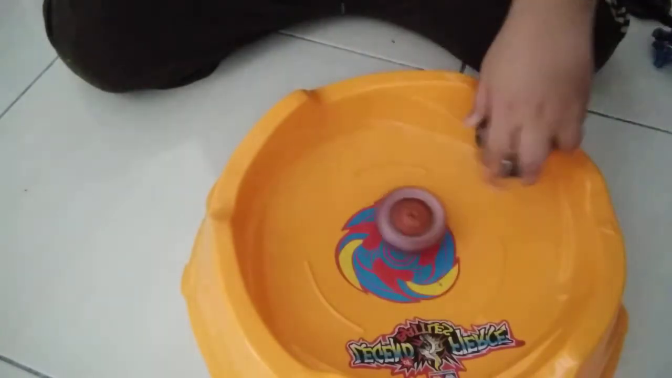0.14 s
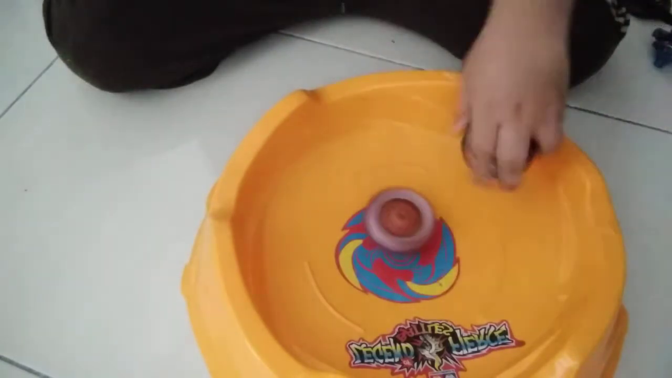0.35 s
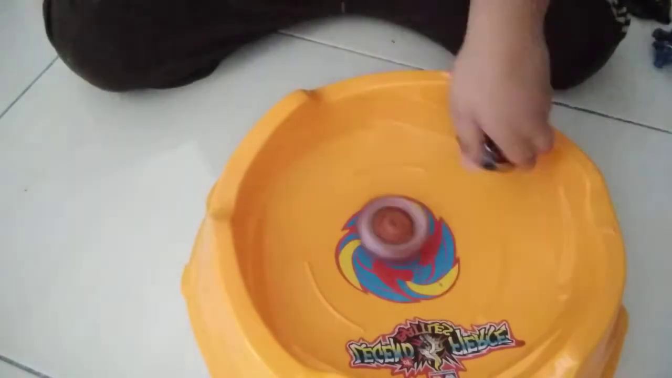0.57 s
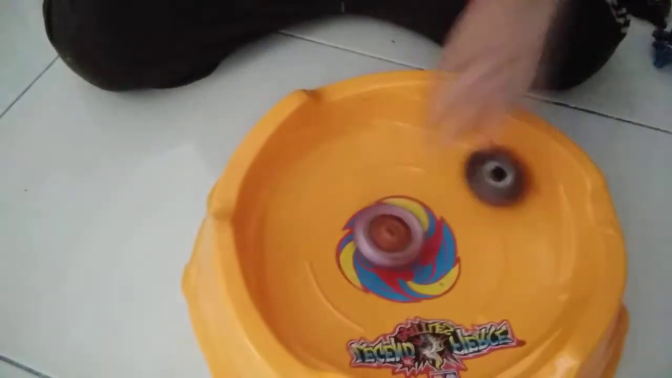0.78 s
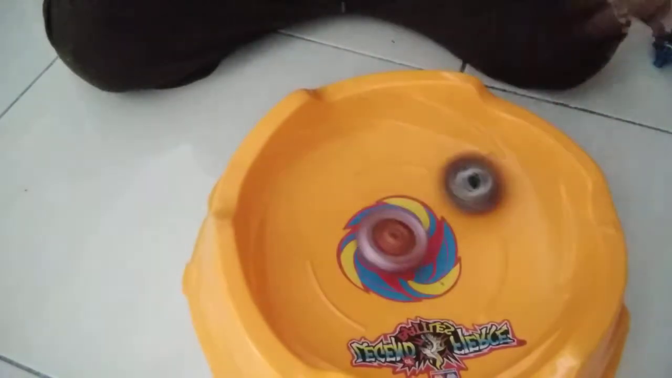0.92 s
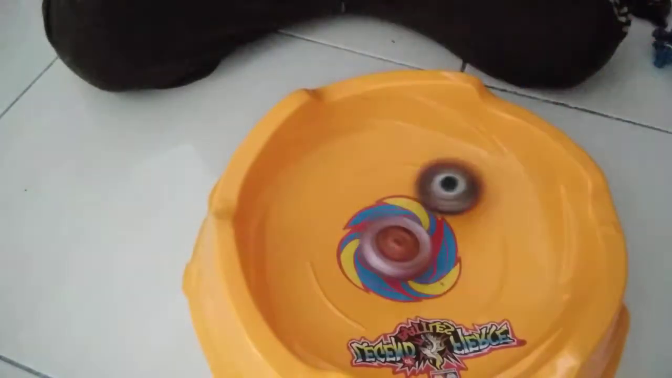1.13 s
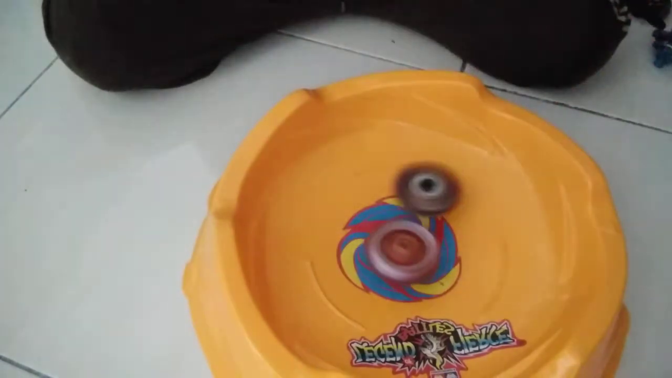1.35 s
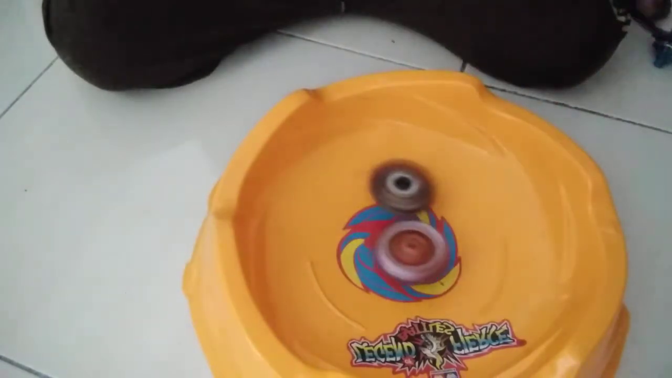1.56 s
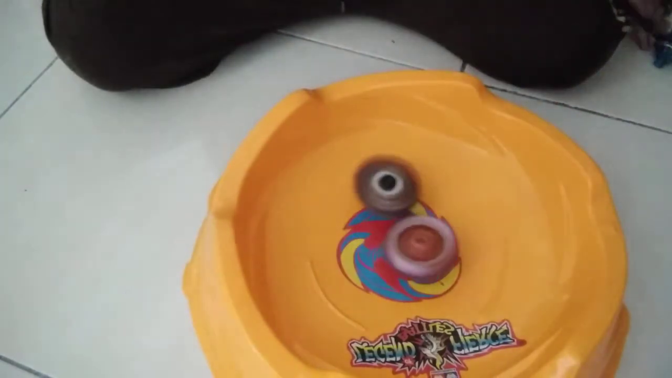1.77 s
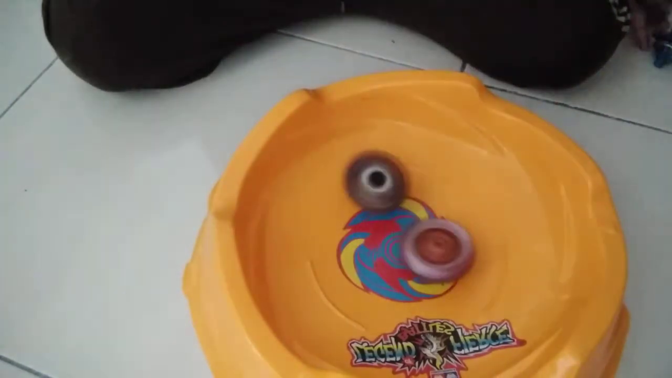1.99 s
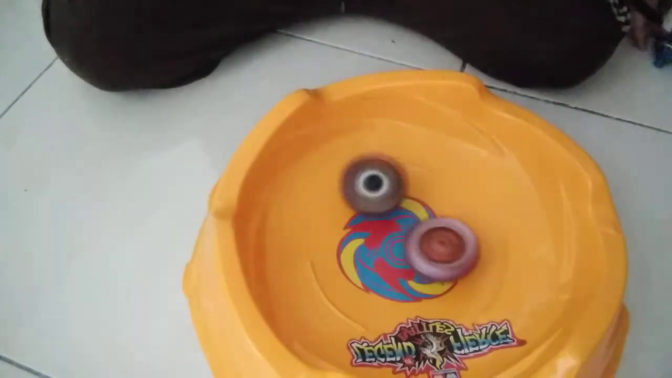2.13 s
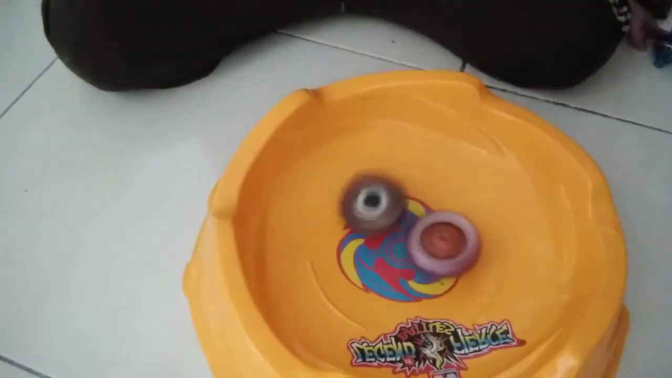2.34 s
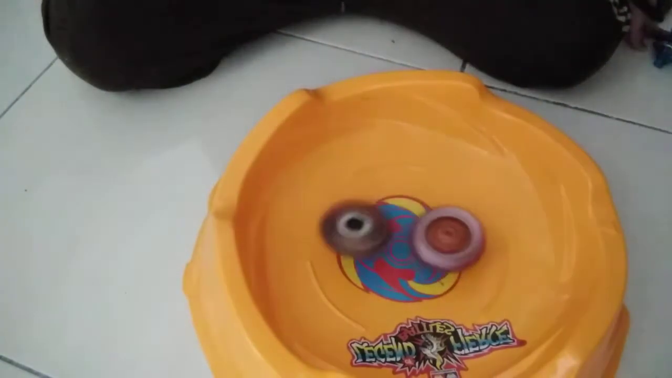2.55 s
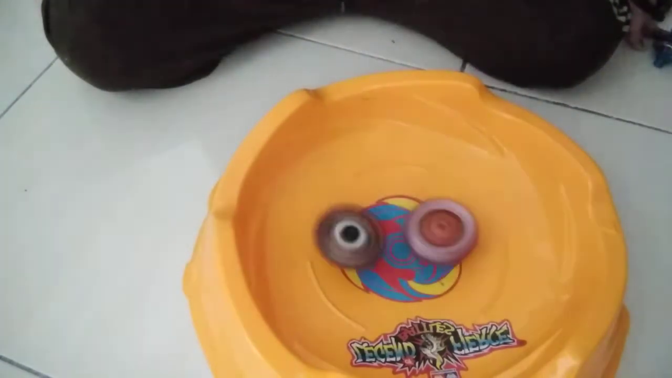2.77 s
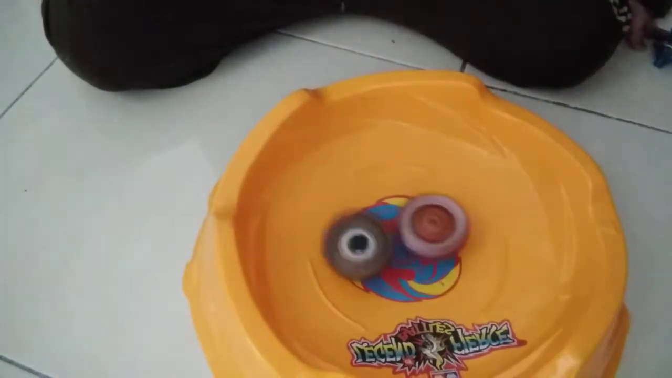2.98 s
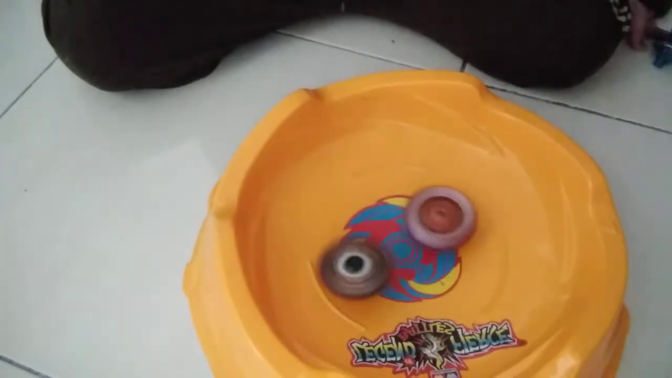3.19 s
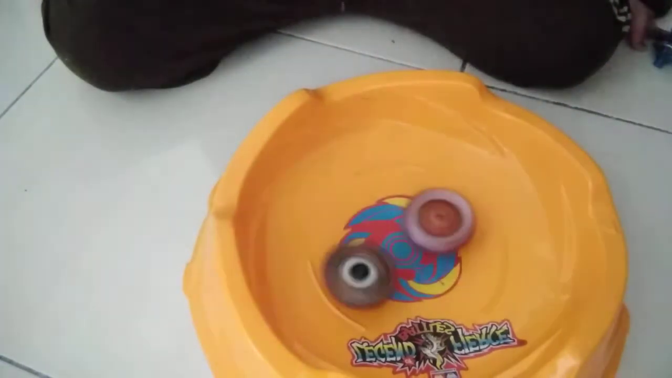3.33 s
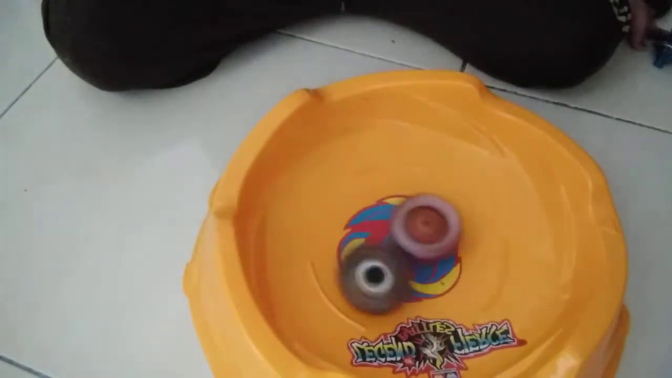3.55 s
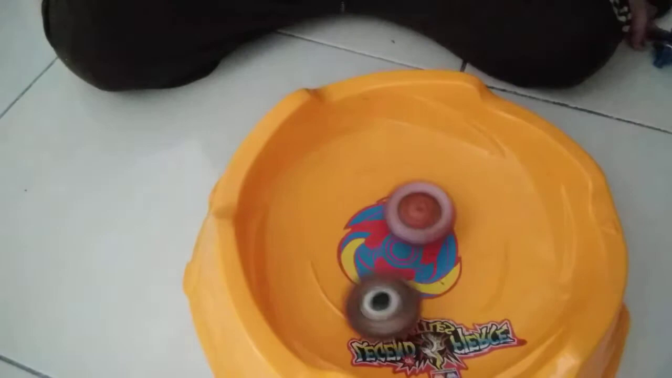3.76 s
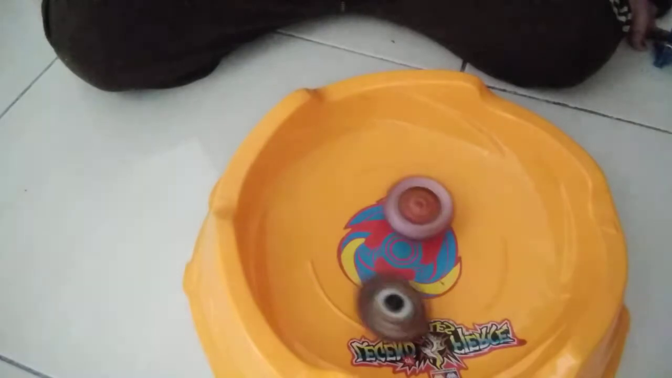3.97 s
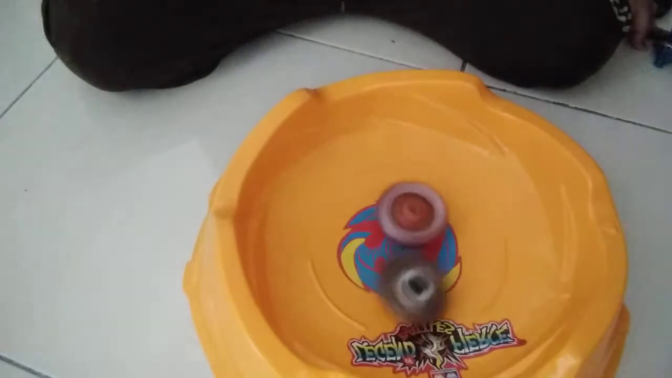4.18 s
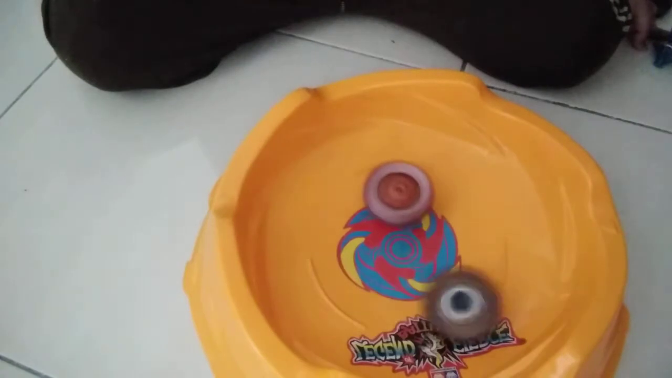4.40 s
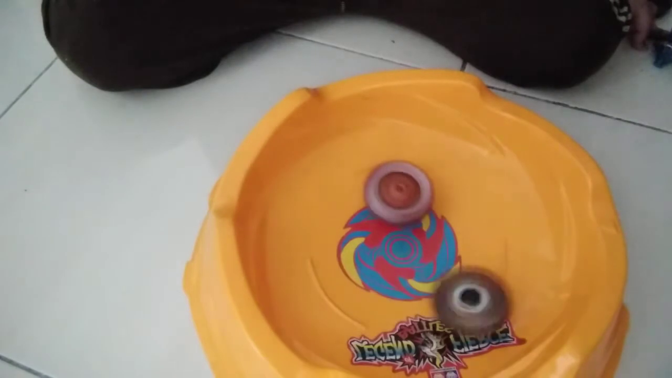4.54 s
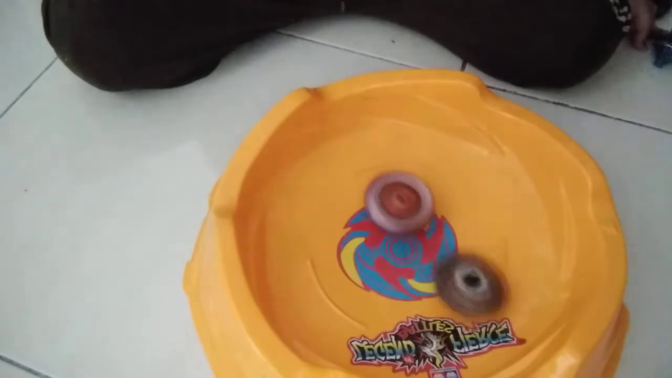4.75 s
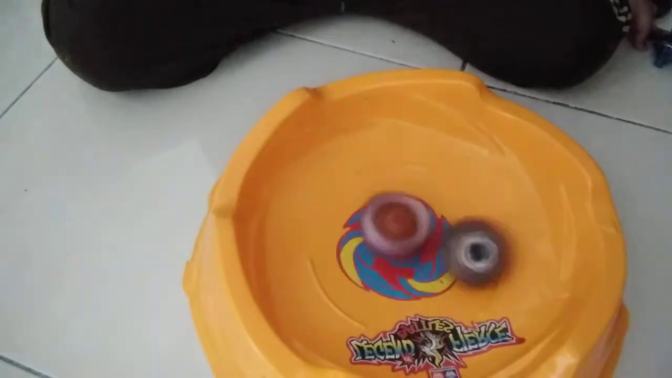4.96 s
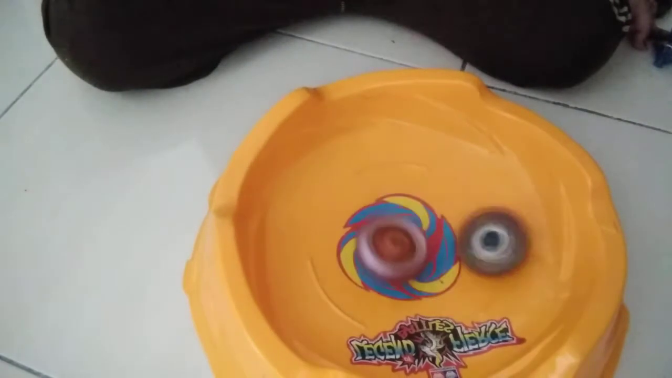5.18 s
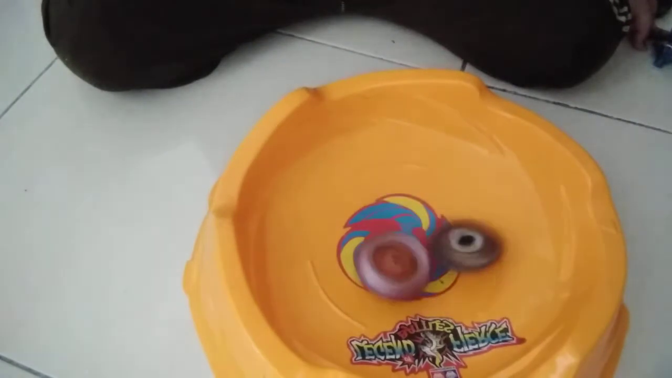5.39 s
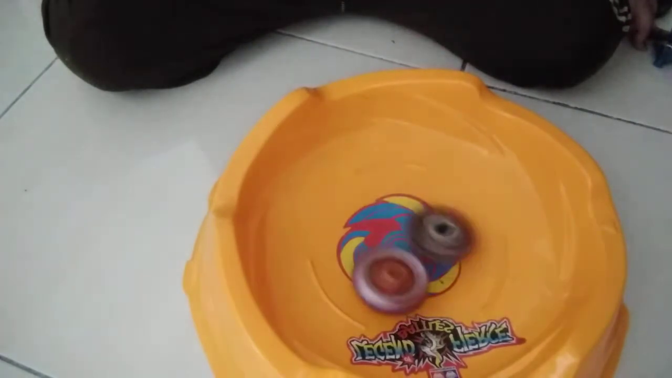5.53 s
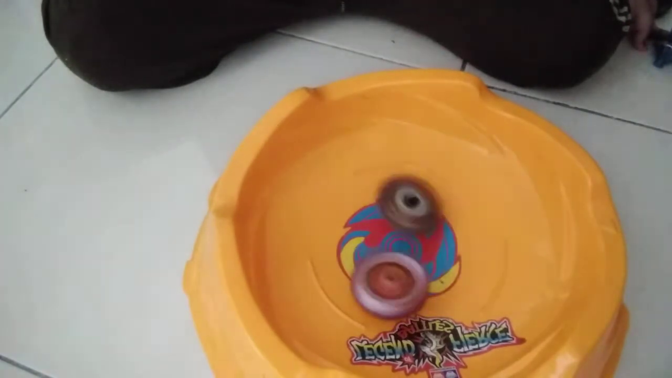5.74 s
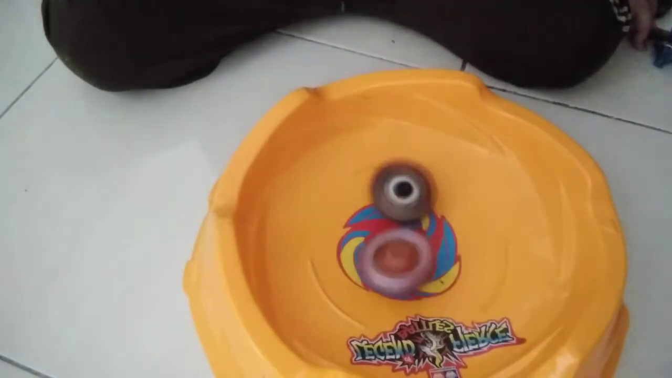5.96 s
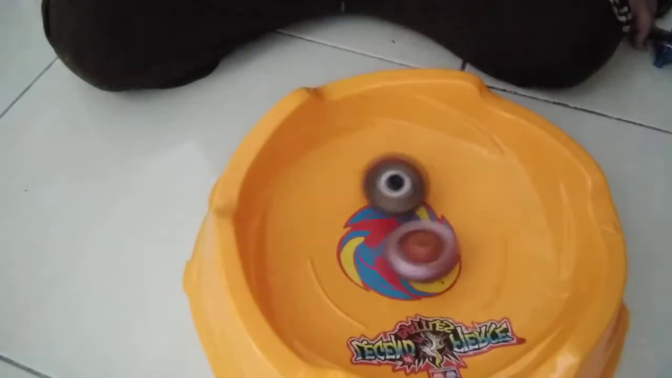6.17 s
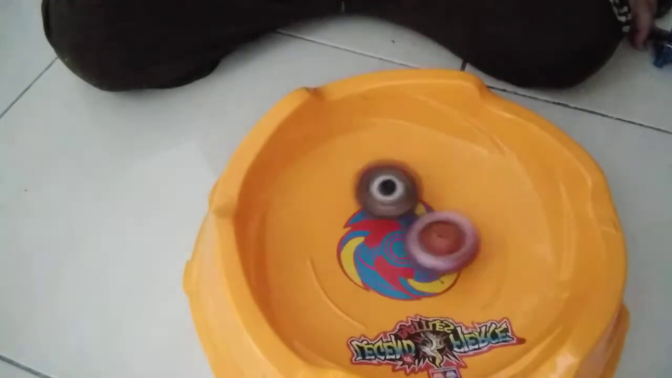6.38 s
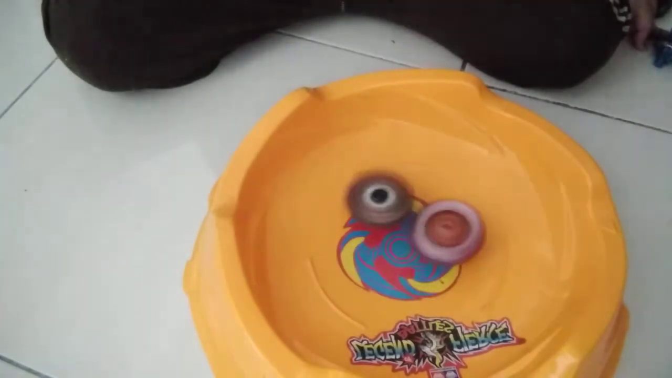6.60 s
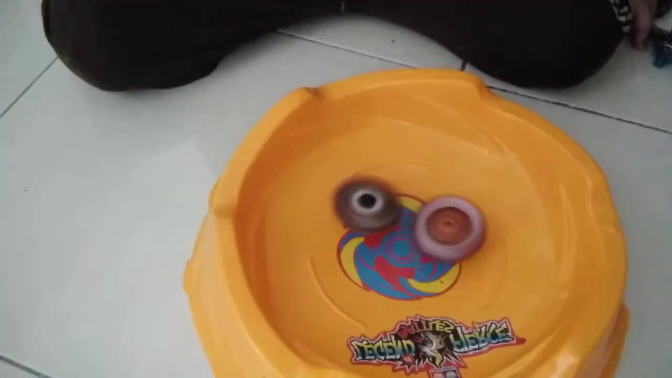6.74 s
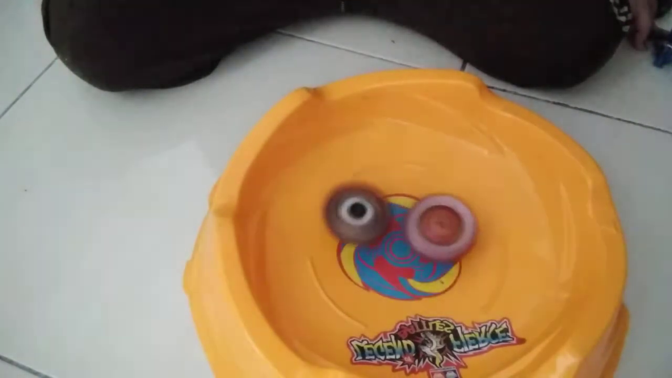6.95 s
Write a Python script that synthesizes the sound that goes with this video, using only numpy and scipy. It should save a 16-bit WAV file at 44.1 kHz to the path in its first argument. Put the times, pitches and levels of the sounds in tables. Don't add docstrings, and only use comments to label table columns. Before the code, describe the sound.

A spinning top drops into a thin plastic bowl, bounces, then scrapes and ticks against another top with irregular sharp, toothed clacks in a bare room.

```python
import sys
import numpy as np
from scipy import signal
from scipy.fft import rfft, irfft
from scipy.io import wavfile
from scipy.ndimage import uniform_filter1d

SR = 44100
rng = np.random.default_rng(int(sys.argv[2]) if len(sys.argv) > 2 else 0)


def undo_db(level):
    steps = np.asarray(level, float) / 20
    return 10 ** steps


def master(y):
    cut = np.clip(np.atleast_2d(y).T, -1, 1)
    pcm = np.round(cut * 32767)
    wavfile.write(sys.argv[1], SR, pcm.astype(np.int16))


N = 309582

# (time [s], peak [dB], bowl floor [dB], bowl wall [dB], top body [dB])
CLASH_EVENTS = [(1.9627, -8.5, -28.5, -20, -11), (2.5403, -10, -21, -30, -11.5),
                (3.1475, -2, -26.5, -24, -14), (3.7001, -8.5, -20.5, -21.5, -12),
                (3.7426, -1, -29, -30.5, -15.5), (4.3563, -5.5, -22, -21.5, -11.5),
                (5.009, -11.5, -23.5, -18, -9), (5.03, -5, -20.5, -19.5, -21),
                (5.0555, -6.5, -22.5, -18, -8.5), (5.235, -21, -18, -7, -13.5),
                (5.5052, -6.5, -26, -27.5, -14.5), (5.5721, -19.5, -22.5, -24, -9.5),
                (6.1311, -12.5, -23, -28, -13), (6.1593, -3, -32, -29.5, -12.5),
                (6.3689, -10, -24, -18.5, -9), (6.7253, -11, -25, -19.5, -14)]
# (frequency [Hz], width [Hz], level [dB])
BOWL_FLOOR = [(212, 106, -10), (280, 194, -7.5), (406.4, 77, -1), (460, 62, 0.5), (594, 84, 1.5),
              (728, 154, -0.5)]
# (frequency [Hz], width [Hz], level [dB])
BOWL_SIDE = [(985, 254, -5.5), (1140, 104, -0.5), (1520, 300, -11)]
# (frequency [Hz], width [Hz], level [dB])
RIM_TREBLE = [(5100, 2000, -3.5), (5890, 3280, -0.5), (7066, 1850, 6), (7320, 1640, 2.5)]
# (frequency [Hz], width [Hz], level [dB])
SCRATCH_MODES = [(1650, 1400, 1), (2140, 1420, 5.5), (3060, 2600, 3.5), (4500, 3800, -3)]


def unit(x):
    return x / np.sqrt(np.mean(x ** 2))


def ring(x, modes, gains_db=None):
    out = 0
    for k, (hz, width, db) in enumerate(modes):
        b, a = signal.iirpeak(hz, hz / width, fs=SR)
        gain_db = db if gains_db is None else db + gains_db[k]
        out = out + (-1) ** k * undo_db(gain_db) * signal.lfilter(b, a, x)
    return out


def band(x, hz, width, db=0):
    return ring(ring(x, [(hz, width, db)]), [(hz, width, 0)])


def walk(rate):
    k = int(SR / rate)
    held = np.repeat(rng.standard_normal(N // k + 1), k)
    return uniform_filter1d(held, k)[:N]


def hum():
    hz = 96.4
    noise = rng.standard_normal((2, N))
    tone = np.sin(2 * np.pi * hz * np.arange(N) / SR)
    skirt = unit(band(noise[0], hz, 32))
    rumble = unit(band(noise[1], 65, 40))
    return undo_db(-76.5) * (tone + 0.66 * skirt) + undo_db(-83.5) * rumble


def air():
    # (frequency [Hz], width [Hz], level [dB])
    humps = [(217, 23, -9), (700, 440, 3), (1620, 510, -8.5), (2740, 2100, -15), (3800, 1600, -16.5)]
    tone = sum(undo_db(2 * walk(28)) * band(rng.standard_normal(N), *hump) for hump in humps)
    return undo_db(-65) * unit(tone)


def bumps():
    grain_db = 4.7 * np.minimum(rng.exponential(size=N), np.log(400))
    return rng.standard_normal(N) * undo_db(grain_db)


def scrape():
    # (time [s], load [dB], skid [0-1])
    tip_path = [(0.79, -72, 0.9), (0.99, -78, 0.34), (1.1, -57.5, 0.51), (1.65, -54, 0.5),
                (1.85, -62.5, 0.77), (2.5, -51, 0.15), (2.88, -60, 0.52), (3.1, -55, 0.05),
                (3.5, -57.5, 0.43), (3.85, -49, 0.58), (4.15, -58, 0.41), (4.4, -46.5, 0.54),
                (4.7, -58, 0.45), (5.1, -48.5, 0.63), (5.35, -53, 0.22), (6.1, -52, 0.43), (6.5, -54.5, 0),
                (7.02, -55, 0.34)]
    t = np.arange(N) / SR
    s, load_db, skid = np.array(tip_path).T
    load_db, skid = np.interp(t, s, load_db), np.interp(t, s, skid)

    tip_db = load_db - 5.5 + 12.5 * skid - 26 * (t < 0.8)
    bright_db = -22 + 27 * skid
    wobble = np.clip(walk(55), -2, 2)

    middle = BOWL_FLOOR[2:] + BOWL_SIDE
    spot_db = [2.7 * walk(6) for _ in middle]
    middle_band = signal.butter(3, [340, 1300], "band", fs=SR, output="sos")
    shake = signal.sosfilt(middle_band, ring(bumps(), middle, spot_db))
    rumble = undo_db(load_db + 2 * walk(32) + 0.79 * wobble) * unit(shake)

    low = unit(sum(undo_db(0.98 * np.tanh(walk(14))) * band(bumps(), *mode) for mode in SCRATCH_MODES))
    high = unit(band(bumps(), 6400, 4300))
    scratch = undo_db(tip_db - 2.5 + 3.1 * wobble) * (low + undo_db(bright_db + 1.6 * walk(170)) * high)

    late = t - 0.583
    rustle_db = -52.5 + np.where(late < 0, 455.5, -130) * late
    rustle = undo_db(rustle_db - 7 + 1.3 * wobble) * (low + undo_db(-1.5 - 60 * np.abs(late)) * high)
    return rumble + rustle + scratch


def strike(s, peak_db, parts, tooth_hz, length_ms):
    t = np.arange(4096) / SR
    noise, colour = rng.standard_normal(4096), rng.standard_normal((5, 9))
    tooth_phase = t * tooth_hz * (1 + 0.14 * colour[0, -1]) % 1
    teeth = 0.18 + np.exp(-tooth_phase / 0.56)
    fade = np.exp(-(t * 1000 / length_ms) ** 2) * np.minimum(t / 0.00078, 1)

    push = rfft(noise * teeth * fade)
    smooth = np.sqrt(uniform_filter1d(np.abs(push) ** 2, size=24))
    force = irfft(push / smooth) * np.sqrt(fade)

    piece = np.zeros((2, 4096))
    for (modes, db), spot in zip(parts, colour):
        part = ring(force, modes, 2.0 * spot)
        part = undo_db(peak_db + db) * part / np.abs(part).max()
        lag = int(abs(spot[-2]) * length_ms * SR / 2000)
        click = 1.0 * (np.arange(4096) == lag)
        piece += [part, np.std(part) * unit(ring(click, modes))]
    return int(s * SR) - 50, piece


def place(pieces):
    out = np.zeros((2, N + 4096))
    for i, piece in pieces:
        out[:, i:i + 4096] += piece
    return out[:, :N]


def blows(rows, tooth_hz, length_ms, bowl_trim_db, core_trim_db, rim_trim_db):
    # (frequency [Hz], width [Hz], level [dB])
    core_modes = [(2050, 500, -8), (2700, 240, 0)]
    # (frequency [Hz], width [Hz], level [dB])
    rim_bass = [(3260, 340, -1.5), (3700, 130, 7.5), (3766, 390, 3), (4410, 610, 0.5)]
    bodies = (RIM_TREBLE, BOWL_FLOOR, BOWL_SIDE, core_modes, rim_bass)
    pieces = []
    for s, db, floor_db, wall_db, top_db in rows:
        shares = [0, floor_db + bowl_trim_db, wall_db + bowl_trim_db, top_db + core_trim_db, top_db + rim_trim_db]
        pieces.append(strike(s, db, zip(bodies, shares), tooth_hz, length_ms))
    return place(pieces)


def brushes():
    # (time [s], peak [dB], bowl [dB], top body [dB])
    glances = [(0.8052, -35.5, -38, -14), (0.8213, -25, -54, -17), (4.4074, -21.5, -15, -26),
               (4.426, -24.5, -15, -10), (5.277, -31, -13, -11), (5.284, -30.5, -22, -6),
               (5.2906, -27.5, -26, -7.5), (5.3057, -35.5, -25, -8), (5.403, -28, -25, -10),
               (5.4385, -34.5, -14, -5.5), (6.532, -28.5, -22, -7.5), (6.5822, -30, -17, -11),
               (6.6275, -25, -23.5, -11.5), (6.6549, -28.5, -13.5, -9.5), (6.7022, -27, -13.5, -5.5),
               (6.8176, -32, -23, -7)]
    rows = [(s, db, bowl_db, bowl_db, top_db) for s, db, bowl_db, top_db in glances]
    return blows(rows, tooth_hz=505, length_ms=5.3, bowl_trim_db=4, core_trim_db=3, rim_trim_db=0)


def room(direct, spread):
    # (frequency [Hz], decay time T60 [s], level [dB])
    tail_bands = [(240, 0.42, -17.5), (600, 0.42, -27), (1300, 0.38, -17), (2800, 0.63, -26),
                  (4700, 0.44, -17.5), (7500, 0.83, -43)]
    # (delay [s], level [dB])
    reflections = [(.0155, -11.5), (.019, -16), (.025, -19), (.031, -17), (.041, -22)]
    t = np.arange(SR) / SR
    tail = 0
    for hz, t60, db in tail_bands:
        tail = tail + undo_db(db - 60 * t / t60) * unit(ring(rng.standard_normal(SR), [(hz, 1.16 * hz, 0)]))
    build_up = np.clip((t - 0.004) / 0.0015, 0, 1)

    echoes = np.zeros(SR // 10)
    for s, db in reflections:
        i = int(s * SR)
        smear = signal.windows.exponential(16, 0, 3, False) * rng.choice([-1, 1], 16) / 1.4
        echoes[i:i + 16] += undo_db(db) * smear
    late = signal.fftconvolve(spread, tail * undo_db(-28) * build_up)
    return signal.fftconvolve(direct, echoes)[:N] + late[:N]


def landing():
    # (time [s], peak [dB], bowl floor [dB], bowl wall [dB], top body [dB])
    bounces = [
        (0.8775, -10.5, -12.5, -16, -10.5),
        (0.8824, -16, -15, -8, -35.5),
        (0.898, -25, -1.5, -10, -6.5),
        (0.9585, -21.5, -10, -32, -10),
        (0.9722, -38, -22, -18, 4),
        (1.0128, -32, -15, -14, -19),
        (1.0416, -26.5, -11.5, -12.5, -10.5),
        (1.0516, -35.5, -22, -27, -8.5),
    ]
    return blows(bounces, tooth_hz=266, length_ms=11, bowl_trim_db=7, core_trim_db=5, rim_trim_db=4)


def thumps():
    # (time [s], peak [dB], pitch [Hz], decay time T60 [s])
    knocks = [
        (0.89, -27.5, 135, 0.15),
        (0.959, -34, 112, 0.095),
        (1.047, -31.5, 71, 0.063),
        (1.46, -54, 87.5, 0.59),
    ]
    out, t = np.zeros(N), np.arange(N) / SR
    shudder = unit(band(rng.standard_normal(N), 130, 130))
    for s, db, hz, t60 in knocks:
        age = np.maximum(t - s, 0)
        out += undo_db(db - 60 * age / t60) * np.sin(2 * np.pi * hz * age)
        out += undo_db(db - 24 - 60 * age / 0.55) * shudder * np.minimum(age / 0.0017, 1)

    rocking = unit(band(rng.standard_normal(N), 164, 110))
    age = t[:SR // 2]
    for s, db, floor_db, *_ in CLASH_EVENTS:
        span = slice(int(s * SR), int(s * SR) + len(age))
        swell = undo_db(db + 0.59 * floor_db - 36 - 60 * age / 0.32) * np.minimum(age / 0.012, 1)
        out[span] += swell[:len(out[span])] * rocking[span]
    return out


def wobbles():
    # (first tick [s], last tick [s], peak [dB], brightness [dB], resonance [Hz])
    tick_runs = [(1.206, 1.4523, -33.5, -11.5, 2180), (1.502, 1.6492, -33, -11, 3220),
                 (1.7057, 1.8065, -33.5, -6.5, 3450), (2.2867, 2.506, -36, -9, 3280),
                 (3.5664, 3.677, -38.5, -19, 2700), (4.111, 4.2763, -33.5, -14, 2870),
                 (4.467, 4.58, -35.5, -15, 2400), (4.743, 4.96, -33, -18, 2660),
                 (5.676, 5.7897, -30, -7, 2250), (5.9284, 6.037, -38.5, -2.5, 2560),
                 (5.897, 6.012, -36.5, -2.5, 3200)]
    rows = []
    for first, last, db, bright_db, hz in tick_runs:
        period = 0.047 + 0.0018 * first
        count = round((last - first) / period) + 1
        chance = rng.standard_normal((count, 2))
        for s, (a, b) in zip(np.linspace(first, last, count), chance):
            tick_db = db + 2 * a + 12.5 * (s - (first + last) / 2)
            rows.append((s, tick_db, bright_db, hz * np.exp(0.053 * b)))
    return rows


def ticks():
    # (time [s], peak [dB], brightness [dB], resonance [Hz])
    rubs = [(1.5271, -35, -30.5, 3020), (1.545, -42, 10.5, 4710), (1.5714, -28.5, -0.5, 4500),
            (1.7828, -34, 7, 3300), (1.8394, -38.5, -4.5, 3590), (2.4192, -39.5, -9, 1790),
            (2.675, -30.5, -4.5, 3700), (2.7139, -36.5, -22, 3260), (2.7427, -35.5, -21, 2080),
            (2.7849, -34.5, -2.5, 2750), (3.133, -34, -10.5, 3000), (3.2813, -26, -21, 2460),
            (3.322, -31, -22.5, 2380), (3.3588, -34.5, -17, 2470), (3.9977, -37, -14, 3280),
            (4.0822, -42, -9, 3270), (4.2954, -37, -4, 3280), (4.3152, -31, -11, 2880),
            (4.8189, -36, -10, 2380), (5.008, -25, 2, 3800), (5.226, -25.5, -9, 2490),
            (5.4982, -21.5, -3, 3460), (5.752, -32, -1.5, 2860), (5.8263, -28.5, -0.5, 2560),
            (5.836, -31.5, -13.5, 3000), (1.629, -42, -10, 2960), (6.342, -35, 1, 2930),
            (6.841, -29, -12, 2790), (6.9195, -34.5, -0.5, 2000), (6.9426, -32, -32, 2700)]
    pieces = []
    for s, db, bright_db, hz in rubs + wobbles():
        parts = [([(hz, 700, 0)], -7), (SCRATCH_MODES, -7), (RIM_TREBLE, bright_db + 0.5),
                 (BOWL_FLOOR[2:] + BOWL_SIDE, -12)]
        pieces.append(strike(s, db, parts, tooth_hz=301, length_ms=7))
    return place(pieces)


def clashes():
    return blows(CLASH_EVENTS, tooth_hz=482, length_ms=6, bowl_trim_db=4.5, core_trim_db=0.5, rim_trim_db=3)


def scene():
    direct, spread = clashes() + brushes() + landing() + ticks()
    return (direct + room(direct, spread) + thumps() + scrape() + hum() + air())[None]


def suppress(x):
    hz, _, z = signal.stft(x, SR, nperseg=1024)
    power = uniform_filter1d(np.abs(z) ** 2, size=3, axis=-2)
    power = uniform_filter1d(power, size=4, axis=-1) + 1e-18
    limit = undo_db(2 * -94) * (hz[:, None] > 1100)
    gain = np.clip(1 - limit / power, undo_db(-20), 1)
    return signal.istft(z * gain, SR, nperseg=1024)[1][..., :N]


def band_limit(x):
    return signal.sosfilt(signal.butter(12, 8930, fs=SR, output="sos"), x)


def record(dry):
    treble_cut = signal.cheby2(18, 88, 1.1325 * 7990, fs=SR, output="sos")
    bass_cut = signal.butter(3, 52, "high", fs=SR, output="sos")
    cut = signal.sosfilt(bass_cut, signal.sosfilt(treble_cut, suppress(dry)))
    rounded = cut - 0.05 * np.sign(cut) * np.maximum(np.abs(cut) - 0.45, 0) ** 2
    return band_limit(rounded)


dry = scene()
out = record(dry)
master(out)
```